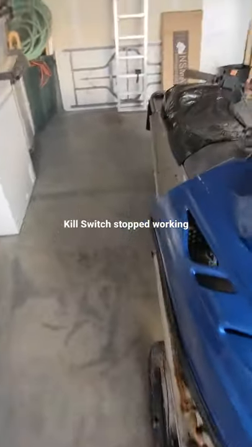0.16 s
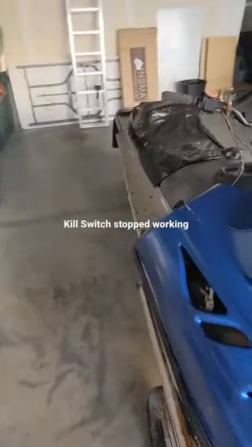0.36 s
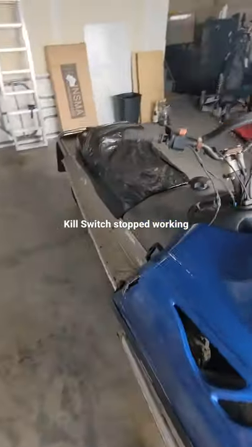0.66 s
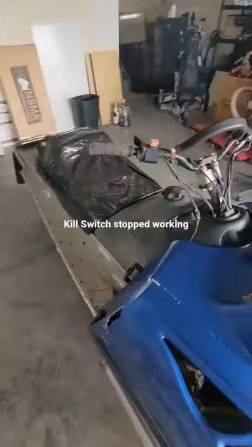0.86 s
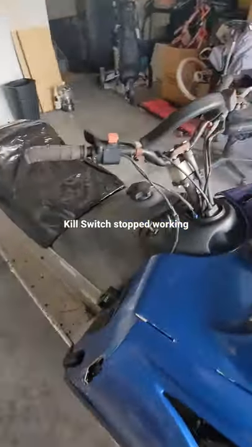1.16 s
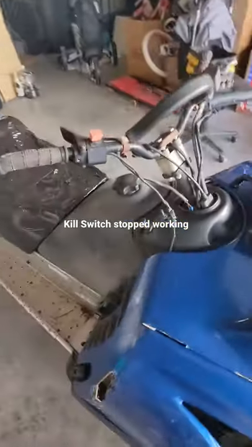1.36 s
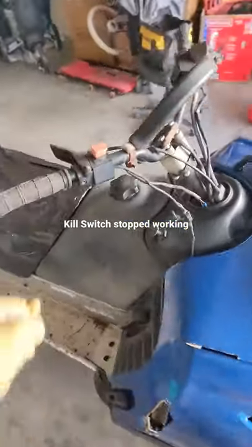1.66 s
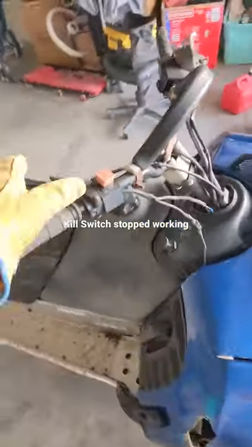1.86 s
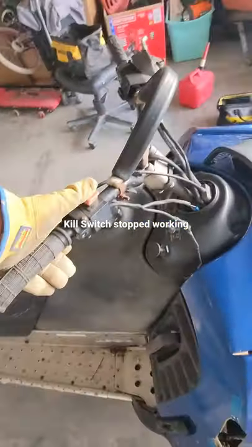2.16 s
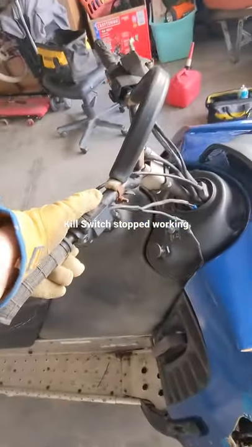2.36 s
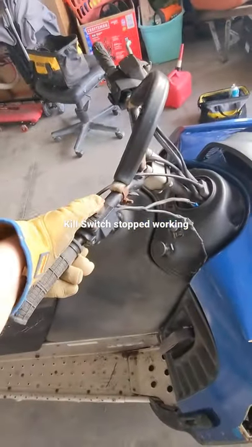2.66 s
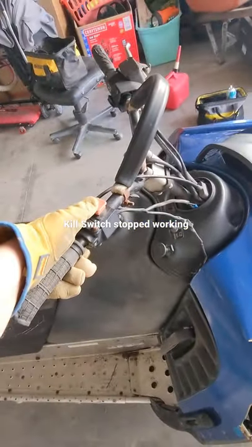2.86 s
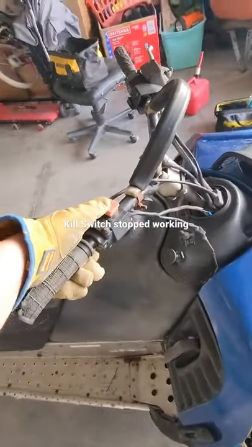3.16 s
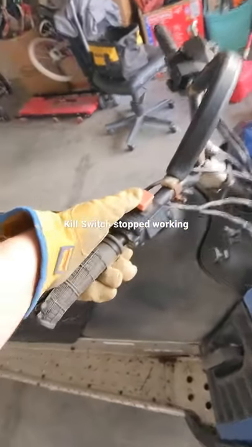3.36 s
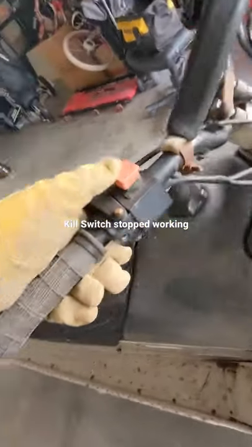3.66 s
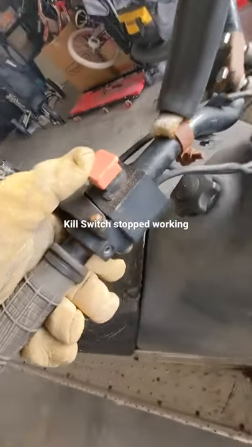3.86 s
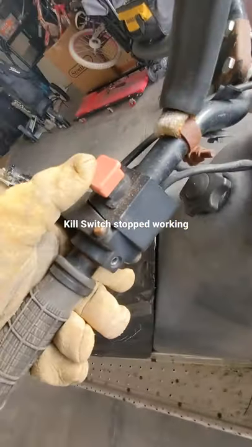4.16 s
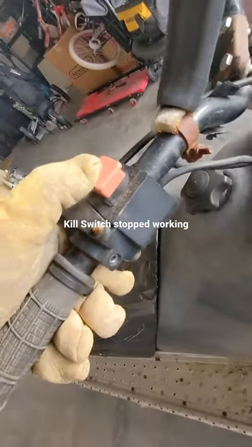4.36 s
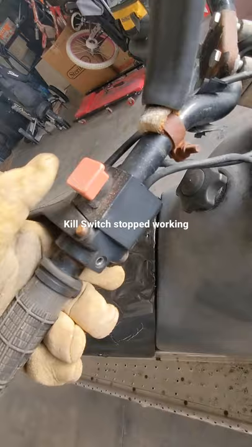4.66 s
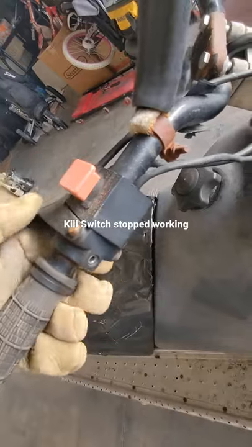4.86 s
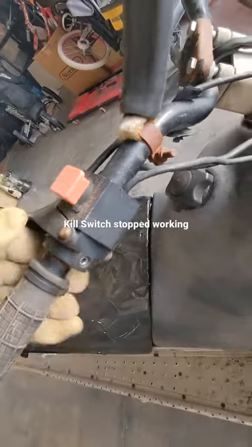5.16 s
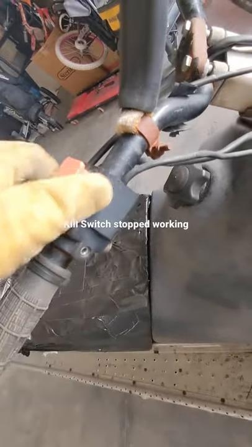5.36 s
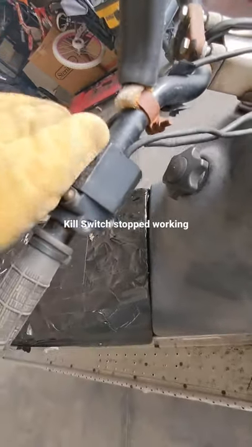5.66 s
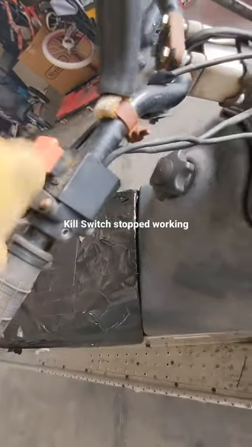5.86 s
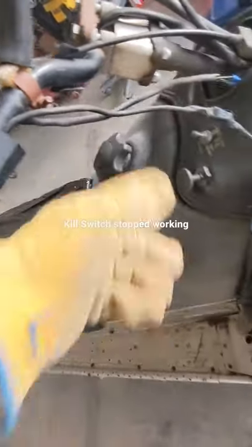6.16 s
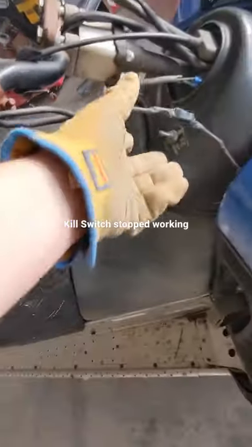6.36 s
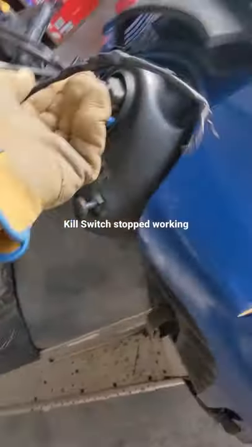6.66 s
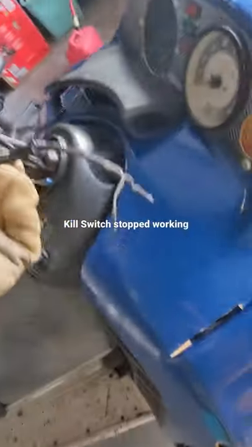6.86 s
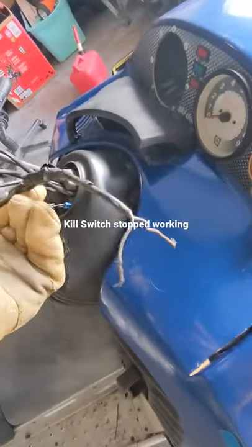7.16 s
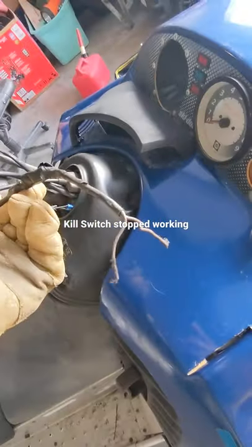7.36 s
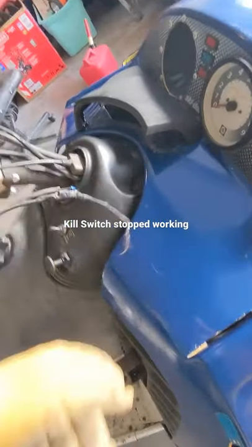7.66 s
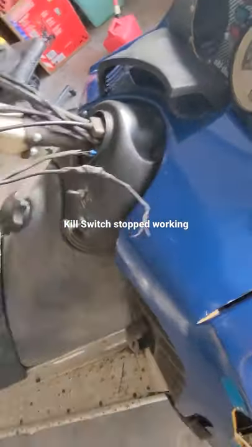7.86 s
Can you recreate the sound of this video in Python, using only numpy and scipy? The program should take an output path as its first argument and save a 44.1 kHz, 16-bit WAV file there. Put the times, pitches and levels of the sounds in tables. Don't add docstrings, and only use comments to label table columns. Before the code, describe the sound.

Lumpy snowmobile idle with irregular exhaust puffs, tinny ringing and a faltering low hum indoors; a switch snaps twice, but the engine keeps running.

```python
import sys
import numpy as np
from scipy import signal
from scipy.fft import rfft, irfft, next_fast_len
from scipy.io import wavfile
from scipy.ndimage import map_coordinates

SR = 44100
rng = np.random.default_rng(int(sys.argv[2]) if len(sys.argv) > 2 else 0)


def voltage_ratio(decibels):
    exponent = np.asarray(decibels, float) / 20
    return 10 ** exponent


def dump_mix(stems):
    frames = np.atleast_2d(stems).T
    limited = np.clip(frames, -1, 1)
    pcm = np.round(limited * 32767).astype(np.int16)
    wavfile.write(sys.argv[1], SR, pcm)


N = 353682


def unit(x):
    return x / np.sqrt(np.mean(x ** 2) + 1e-20)


def along(points, hz):
    f, v = np.transpose(points)
    return np.interp(np.log(hz + 1), np.log(f + 1), v)


def curves(rows):
    s, *cols = np.transpose(rows)
    return [np.interp(np.arange(N) / SR, s, c) for c in cols]


def wobble(rate_hz):
    knots = rng.standard_normal(int(N * rate_hz / SR) + 4)
    return map_coordinates(knots, [np.arange(N) * rate_hz / SR])


def filtered(x, response):
    m = next_fast_len(N + SR // 2)
    return irfft(rfft(x, m) * response(np.fft.rfftfreq(m, 1 / SR)), m)[..., :N]


def resonant(modes):
    def response(f):
        total = 0
        for k, (c, w, db) in enumerate(modes):
            total = total + (-1) ** k * voltage_ratio(db) * 1j * f * w / (c * c - f * f + 1j * f * w)
        return total
    return response


def booming(modes):
    def response(f):
        power = 0
        for mode in modes:
            skirt = 1 + ((f - mode[0]) / (2 * mode[1])) ** 2
            power = power + np.abs(resonant([mode])(f)) ** 2 / skirt
        return np.sqrt(power)
    return response


def excited(response, flow, grain_db):
    noise = rng.standard_normal((2, N)) * voltage_ratio(grain_db * wobble(250))
    return filtered(noise * flow, response) / np.std(filtered(noise, response))


def note(hz, slip, lag):
    phase = 2 * np.pi * np.cumsum(hz * np.ones(N)) / SR + slip * wobble(15)
    apart = lag + 0.5 * slip * wobble(15)
    return np.sqrt(2) * np.sin(phase + np.array([apart, -apart]) / 2)


# f/Hz, likeness/0-1
LIKENESS = [(60, .98), (180, .95), (400, .8), (700, .3), (1500, 0), (15000, 0)]


def ports(pair):
    def split(hz):
        turn = np.arccos(np.clip(along(LIKENESS, hz), -1, 1)) / 2
        return np.array([np.cos(turn), np.sin(turn)])
    mid, side = filtered(pair, split)
    return np.array([mid + side, mid - side])


# t/s, nearness to hood/dB, left minus right/dB, view of chamber/dB
PLACE = [(0.0, 3.5, 2, 3.5), (1.0, 2, 1, -0.5), (1.8, -1, 0.5, -2.5), (2.5, 0.5, 1, -3.5),
         (3.4, 0, -0.5, -5.5), (4.0, -0.5, -5, 5), (4.45, -2, -2, 6.5), (4.8, -1.5, -4.5, 3),
         (6.4, -2.5, -2.5, 3.5), (7.0, -2.5, -2.5, -1.5), (8.02, -1, -1, 1.5)]


def place():
    return curves(PLACE)


# t/s, puff/dB, blow on exhaust/dB
FIRINGS = [(0.007, -21, -20.5), (0.09, -15.5, -17.5), (0.198, -16.5, -16), (0.2573, -19.5, -17),
           (0.38, -35, -25), (0.4105, -24, -25), (0.4678, -23, -18.5), (0.5807, -15.5, -12),
           (0.766, -16, -13.5), (0.9552, -16, -15.5), (1.1417, -16, -16.5), (1.2092, -18.5, -18.5),
           (1.3168, -25.5, -23), (1.3822, -20, -20.5), (1.4388, -18, -17.5), (1.51, -24.5, -30),
           (1.5733, -29, -26), (1.6154, -20, -20.5), (1.6402, -17.5, -21.5), (1.7484, -21.5, -22),
           (1.8555, -18, -16), (2.032, -19, -16), (2.2141, -18.5, -18), (2.2435, -16, -17),
           (2.3807, -21, -18), (2.451, -17, -16.5), (2.6364, -21.5, -19.5), (2.6685, -18.5, -23),
           (2.7631, -20.5, -19.5), (2.832, -16.5, -16), (2.9058, -29, -29), (3.059, -23.5, -18.5),
          (3.088, -23, -24.5), (3.1954, -27, -28), (3.263, -19, -16), (3.4114, -18, -17.5),
          (3.484, -18.5, -19.5), (3.589, -26, -22), (3.6973, -17, -17.5), (3.857, -24.5, -20.5),
          (3.9669, -33, -30), (4.0118, -24.5, -20), (4.089, -23.5, -25), (4.1437, -22.5, -22.5),
          (4.2767, -19.5, -21.5), (4.407, -26, -31), (4.5585, -27, -29), (4.614, -22, -23.5),
          (4.669, -20.5, -21), (4.792, -19.5, -19), (4.9107, -22.5, -19.5), (5.0184, -30, -29),
          (5.0629, -26.5, -25), (5.0973, -25.5, -29), (5.196, -19.5, -20.5), (5.3297, -26.5, -23.5),
          (5.3636, -25, -28), (5.4176, -19, -21),
           (5.5488, -19.5, -22.5), (5.688, -21.5, -21.5), (5.7582, -22, -23.5), (5.812, -18.5, -20),
              (5.9327, -26, -27.5), (5.9807, -20, -20), (6.1125, -27.5, -23.5), (6.1663, -36, -30),
              (6.2332, -19, -22.5), (6.3424, -21, -22.5), (6.4043, -22.5, -25.5), (6.5499, -26, -26),
              (6.6058, -26.5, -22), (6.674, -24, -25.5), (6.7777, -23.5, -25), (6.9076, -20, -21.5),
              (7.0408, -23.5, -19.5), (7.1626, -23.5, -23.5), (7.2367, -21.5, -19), (7.2953, -23.5, -24),
              (7.422, -25.5, -24), (7.5028, -24.5, -23), (7.619, -21.5, -20.5), (7.675, -32, -28),
              (7.767, -18.5, -21.5), (7.9344, -22, -28), (8.0026, -21, -21)]
FIRING_S, PUFF_DB, BLOW_DB = np.transpose(FIRINGS)


def breath(db, rise_s, t60_s, lead_s=0.0054):
    kicks, t = np.zeros(N), np.arange(SR // 2) / SR
    kicks[np.round((FIRING_S - lead_s) * SR).astype(int)] = voltage_ratio(2 * db)
    shape = ((1 - np.exp(-(t / rise_s) ** 2)) * voltage_ratio(-60 * t / t60_s)) ** 2
    return np.sqrt(np.abs(signal.fftconvolve(kicks, shape / shape.max())[:N]))


def scatter():
    return 0.5 * rng.standard_normal(len(FIRING_S))


def crank(depth_db):
    crank_hz = 32.16
    turn = np.cumsum(crank_hz * (1 + 0.16 * wobble(11))) / SR % 1
    return unit(voltage_ratio(-depth_db * turn + 0.55 * wobble(30)))


# t/s, f/Hz, level/dB, unrest/0-1
DRONE = [(0.0, 131.9, -9.5, 0.9), (0.76, 124.2, -14, 1.1), (1.14, 128.5, -11.5, 0.65),
         (1.43, 123.2, -9.5, 0.57), (2.28, 129, -11.5, 1), (2.81, 124.2, -9, 0.64),
         (3.35, 131.3, -11.5, 0.74), (3.51, 125.5, -9, 0.7), (3.95, 131.4, -12.5, 0.63),
         (4.15, 123.6, -9.5, 0.26), (4.37, 125.9, -9.5, 0.35), (4.48, 128, -12, 0.7),
         (4.72, 128.2, -9.5, .3), (5.85, 124.1, -10, 0.35), (6.48, 128.5, -12.5, 1.0),
         (7.3, 125.3, -10.5, 0.84), (7.84, 129.7, -11.5, .9), (8.02, 120.3, -15, 0.5)]
# t/s, depth/dB, width/s
STUMBLES = [(0.104, 19.5, 0.019), (0.444, 13, 0.025), (0.723, 5, 0.05), (0.817, 16, 0.015),
            (0.878, 9, 0.018), (1.083, 7.5, 0.076), (1.671, 22, 0.022), (2.0, 7, 0.047), (2.155, 11, 0.045),
            (2.39, 10, 0.029), (2.604, 4.5, 0.072), (2.784, 9, 0.028), (3.013, 6, 0.035), (3.208, 8, 0.033),
            (3.278, 11, 0.022), (3.816, 4, 0.064), (4.45, 11, 0.025), (4.51, 9, 0.054), (4.633, 6, 0.032),
            (5.093, 4, 0.044), (6.071, 6, 0.024), (6.326, 14, 0.029), (6.42, 9, 0.018), (6.491, 22, 0.023),
            (6.8, 8, 0.019), (6.919, 12, 0.025), (7.159, 11, 0.052), (7.388, 13, 0.029), (7.767, 8, 0.039),
            (7.952, 12.3, 0.024)]
# t/s, depth/dB
SLIPS = [(0.19, 5), (0.359, 14), (0.599, 4), (0.629, 12), (0.778, 8), (1.013, 7), (1.383, 4), (1.452, 8),
         (1.736, 10), (2.245, 7), (2.275, 6), (3.133, 7), (3.662, 9), (3.717, 9), (4.41, 11), (4.934, 9),
         (5.682, 6), (5.995, 5), (6.136, 5), (6.191, 4), (6.246, 4), (7.099, 8), (7.633, 4), (7.833, 5)]


def drone():
    kick_hz, waver_hz, flick_hz = 2.86, 2.485, 5.3
    slip_s, beat_db = 0.022, 0.9
    hz, db, unrest = curves(DRONE)
    lean_db = (0.34 + 0.11 * place()[0]) * [[1], [-1]]
    breaks = list(STUMBLES) + [(s, depth_db, slip_s) for s, depth_db in SLIPS]
    t = np.arange(N) / SR
    dips = np.array([np.exp(-np.log(16) * ((t - s) / width) ** 2) for s, _, width in breaks])
    flick = (rng.standard_normal((len(breaks), 1)) * dips).sum(0)
    push = breath(PUFF_DB + 20, rise_s=0.016, t60_s=0.28)
    hz = hz + kick_hz * (push - push.mean()) + waver_hz * unrest * wobble(18) + flick_hz * flick
    shake_db = 0.7 * wobble(25) + 0.9 * wobble(55)
    fall_db = np.transpose(breaks)[1] @ dips + beat_db * unrest * wobble(15) ** 2
    return voltage_ratio(db + 3.0 + lean_db + shake_db - 1.3 * fall_db) * note(hz, slip=0.22, lag=0.072)


# f/Hz, level/dB per Hz
PUFF = [(1410, -1), (2400, -3), (2550, -6.5), (3410, -5), (3720, -11), (5200, -11.5), (5760, -18),
        (7000, -12), (7630, -16.5), (9130, -15.5), (10500, -19), (12400, -12), (15500, -21.5)]


def puffs_and_clatter():
    near_db, pan_db, _ = place()
    bright = lambda hz: voltage_ratio(along([(500, -45)] + PUFF, hz))
    dull = lambda hz: bright(hz) / (1 + 1j * hz / 9000)
    puff = excited(bright, breath(PUFF_DB - 3.5, rise_s=0.0045, t60_s=0.27), grain_db=1.0)
    clatter = excited(dull, voltage_ratio(-33.5 + near_db) * crank(depth_db=8.5), grain_db=-0.5)
    return (puff + clatter) * voltage_ratio(np.array([pan_db - 7.5, -pan_db - 5.0]) / 2)


# f/Hz, width/Hz, level/dB
TIN = [(756.6, 113, -4.5), (793.5, 35, 2.5), (864.5, 54, -3.5), (1054, 81, -3), (1169, 63, -7),
       (1372, 206, -11.5), (1705, 32.5, -5.5), (1823, 42.6, -6), (2219, 30, -6.5), (2324, 80, -13.5),
       (2870, 80, -20.5), (3490, 330, -24), (4480, 87, -27.5)]
# f/Hz, width/Hz, level/dB
PIPE = [(34.5, 16, -5.5), (81, 25, -3), (106.6, 22.4, 6), (149, 22, -1), (182, 17.4, -3.5), (229, 24, -4),
        (282.4, 29, -7), (338.7, 20, -9), (428.8, 32, -9), (454.2, 14.6, -5.5), (550, 165, -15.5)]


def exhaust_body():
    blow = breath(BLOW_DB - 1.5, rise_s=0.0066, t60_s=0.3)
    hum = voltage_ratio(-27 + place()[0]) * crank(depth_db=4.5)
    thud_db = -14 + 0.67 * (BLOW_DB + 18) + scatter()
    thud = breath(thud_db, rise_s=0.0083, t60_s=0.28, lead_s=0.00041)
    gulp = np.hypot(thud, voltage_ratio(-21) * crank(depth_db=3.0))
    tin = excited(resonant(TIN), np.hypot(blow, hum), grain_db=3.5)
    return ports(tin + excited(booming(PIPE), gulp, grain_db=1.5))


def chamber():
    ring_db = -22 + 0.66 * (BLOW_DB + 19.5) + scatter()
    swell = voltage_ratio(place()[2]) * breath(ring_db, rise_s=0.022, t60_s=0.1, lead_s=0.0043)
    tone = note(908.6 * (1 + 0.011 * wobble(40)), slip=1.2, lag=1.3)
    return swell * voltage_ratio(2.0 * wobble(150)) * tone


def panel():
    shaken_db = -33 + 0.36 * place()[0] + 1.6 * wobble(2.4)
    buzz = voltage_ratio(shaken_db + 2.5 * wobble(25) + 2.2 * wobble(70))
    tone = note(746.5 * (1 + 0.006 * wobble(30)), slip=0.9, lag=1.3)
    return (buzz + breath(PUFF_DB - 17, rise_s=0.02, t60_s=0.25)) * tone


# f/Hz, t60/s
GARAGE = [(200, 0.16), (1000, 0.22), (5000, 0.27), (14000, 0.079)]


def garage(x):
    hz, t, z = signal.stft(rng.standard_normal((2, SR // 2)), SR, nperseg=256)
    tail = signal.istft(z * voltage_ratio(-60 * t / along(GARAGE, hz)[:, None]), SR, nperseg=256)[1]
    delayed = np.pad(x, ((0, 0), (400, 0)))
    return signal.fftconvolve(delayed, tail / np.linalg.norm(tail[0]), axes=1)[:, :N]


# t/s, peak/dB, left minus right/dB
CLICKS = [
    (4.3932, -12, -7),
    (5.671, -10, -6),
]
# f/Hz, level/dB per Hz
PLASTIC = [(700, -8), (2000, 1), (3300, -6), (6500, 0), (9000, -6), (13800, -1.5), (15400, -12),
           (15800, -60)]


def switch():
    out, t = np.zeros((2, N)), np.arange(600) / SR
    for s, db, pan_db in CLICKS:
        decay = voltage_ratio(-60 * t / 0.007) * (1 - np.exp(-t / 0.0004))
        snap = decay * rng.standard_normal((2, len(t)))
        start = round(s * SR)
        out[:, start:start + len(t)] += voltage_ratio(db + 7.0 + np.array([[pan_db], [-pan_db]]) / 2) * snap
    return filtered(out, lambda hz: voltage_ratio(along(PLASTIC, hz)))


# f/Hz, left minus right/dB
LEAN = [(300, -0.5), (700, -0.5), (1300, -0.5), (2400, -1), (4400, 0.3), (8100, -6.5), (15000, 1)]


def scene():
    puff, clicks = puffs_and_clatter(), switch()
    body = exhaust_body() + chamber() + panel()
    walls = voltage_ratio(-7) * garage(puff) + voltage_ratio(-31) * garage(clicks) + voltage_ratio(-6.5) * ports(garage(body))
    near = puff + body + clicks + walls
    return filtered(near, lambda hz: voltage_ratio(along(LEAN, hz) * [[0.5], [-0.5]])) + drone()


def low_pass(x):
    return signal.sosfilt(signal.butter(12, 15690, fs=SR, output="sos"), x)


def record(dry):
    heard = filtered(dry, lambda hz: (1j * hz / (28 + 1j * hz)) ** 2)
    rounded = heard / (1 + np.abs(heard / 1.02) ** 6) ** (1 / 6)
    return low_pass(rounded)


dry = scene()
out = record(dry)
dump_mix(out)
```